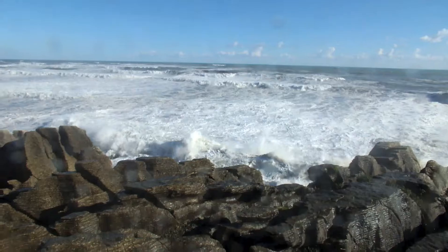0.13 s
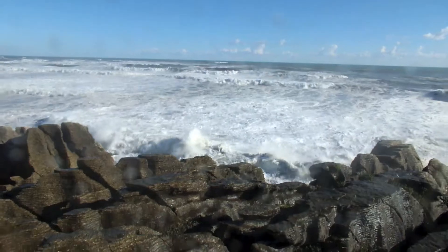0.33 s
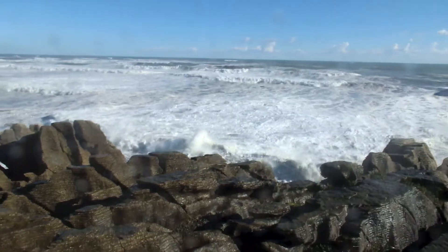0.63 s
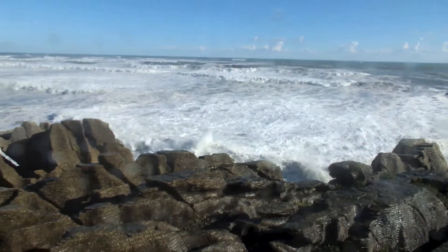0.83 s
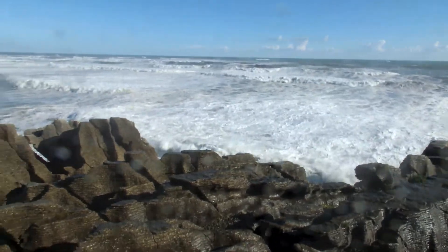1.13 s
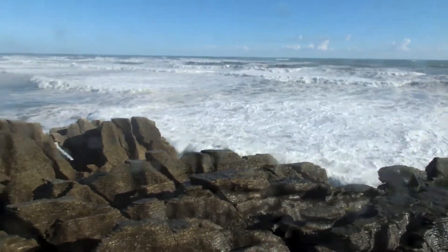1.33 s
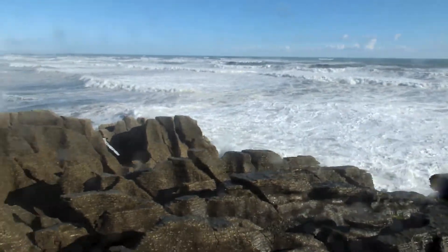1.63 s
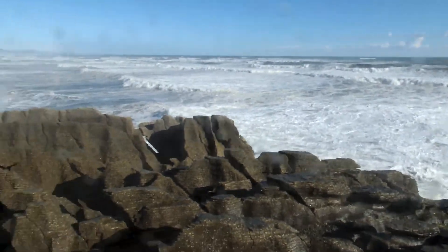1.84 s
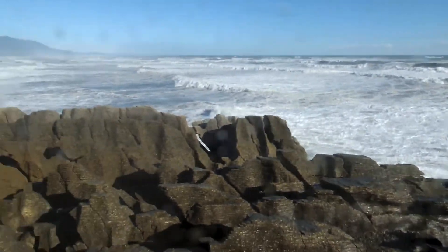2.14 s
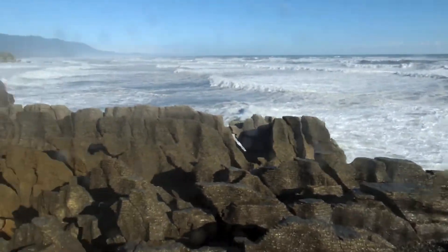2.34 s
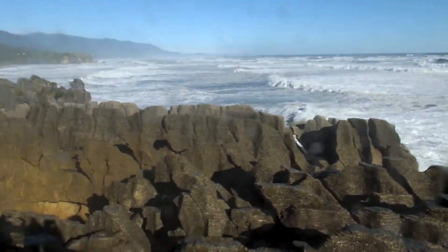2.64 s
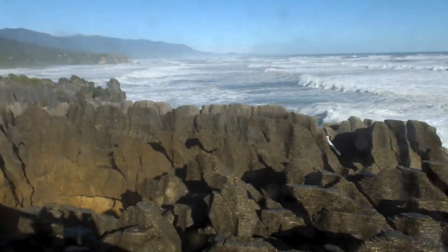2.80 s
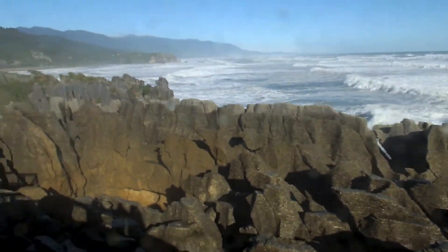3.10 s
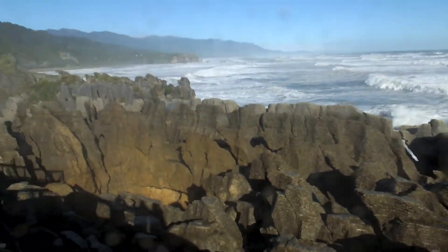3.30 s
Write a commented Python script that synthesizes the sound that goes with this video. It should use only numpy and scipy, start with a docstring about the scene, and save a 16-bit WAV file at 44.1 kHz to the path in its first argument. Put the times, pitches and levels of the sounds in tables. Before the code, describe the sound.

Wind buffets an exposed stereo microphone on a rocky coast, rumbling, fluttering and thumping, with small pops and spitting crackle; surf roars as a broad wash behind, and the right side gusts hardest late on.

```python
"""Gusty wind buffets the two ports of a microphone on a rocky coast, over the roar of surf.
Turbulence at each port is noise split into registers; the upper ones follow that port's gusts, so the sound
brightens with the force of the wind, over a low rumble that swells slowly on both ports.
Eddies add damped oscillations (thumps) and leaking pressure steps (pops); short grainy bursts of bright crackle
spit on the ports. Surf is noise of uneven level, independent on the two sides. All fades in after a silence."""
import sys
import numpy as np
from scipy import signal
from scipy.fft import rfft, irfft
from scipy.io import wavfile

SR = 44100
rng = np.random.default_rng(int(sys.argv[2]) if len(sys.argv) > 2 else 0)


def master_out(mix):
    """Clip the mix to full scale and print it as 16-bit PCM to the path in sys.argv[1]."""
    frames = np.transpose(np.atleast_2d(mix))
    ceiling = np.clip(frames, -1, 1)
    pcm = np.round(ceiling * 32767).astype(np.int16)
    wavfile.write(sys.argv[1], SR, pcm)


N = 152586  # length in samples

# Force of the wind on the left and on the right port. Each row: time in seconds, force in dB.
GUSTS_LEFT = [(0.14, 7), (0.21, 8), (0.29, 10.5), (0.36, 7), (0.38, 0.5), (0.44, 6), (0.48, -5),
              (0.54, 7.5), (0.65, 7), (0.69, 0.5), (0.74, 3), (0.76, 0), (0.83, 5), (0.85, -3.5), (0.91, 6),
              (1.0, 4.5), (1.09, 0), (1.115, -1), (1.15, 9), (1.19, 1), (1.27, 9.5), (1.29, -6), (1.36, 6),
              (1.42, 1.5), (1.49, 8.5), (1.5, -0.5), (1.57, 4), (1.59, -5), (1.66, -0.5), (1.68, 8),
              (1.7, -20), (1.72, 5), (1.78, -4), (1.8, 4), (1.82, -7), (1.85, 4), (1.88, -6.5),
              (1.945, 3.5), (1.967, -6), (1.98, -1.5), (2.06, 1.5), (2.175, -7), (2.22, 4), (2.3, -4.5),
              (2.32, 3.5), (2.34, -8), (2.36, 6.5), (2.38, 9.5), (2.52, 2), (2.555, 17.5), (2.58, 0.5),
              (2.62, 8.5), (2.65, 6.5), (2.67, -13), (2.69, 1.5), (2.75, -7), (2.78, 6), (2.98, 7.5),
              (3.02, 6.5), (3.07, 7), (3.17, 7), (3.28, 4), (3.31, -3.5), (3.35, 11), (3.42, 3.5)]
GUSTS_RIGHT = [(0.2, 7.5), (0.3, 9), (0.37, 2), (0.43, 7.5), (0.49, 1), (0.67, 7), (0.705, -4.5),
               (0.74, 0.5), (0.89, -0.5), (0.915, 2.5), (1.01, 0.5), (1.035, 5), (1.28, 0), (1.31, -2.5),
               (1.37, 7.5), (1.41, 7.5), (1.49, 2.5), (1.51, 6), (1.54, 0), (1.65, 2), (1.675, 7),
               (1.7, -7.5), (1.8, 4), (1.86, -9), (1.88, 4), (1.98, -1.5), (2.0, 5), (2.1, 3.5),
               (2.19, 7.5), (2.26, 0.5), (2.34, 13.5), (2.5, 13.5), (2.62, 18.5), (2.7, 9.5), (2.81, 11.5),
               (2.85, 5.5), (2.875, 12), (2.9, 5), (3.2, 5), (3.25, 9.5), (3.45, 10.5)]
# Spectrum of the wind noise before the gusts shape it. Each row: frequency in Hz, density in dB per Hz.
WIND_SPECTRUM = [(35, -49), (190, -47.5), (350, -49.5), (700, -61), (1400, -73), (3100, -88.5),
                 (4400, -99.5), (6000, -112.5), (12000, -134)]
# How strongly each register follows the force. Each row: frequency in Hz, dB of level per dB of force.
FORCE_RESPONSE = [(60, 0), (180, 0.64), (350, 0.6841), (700, 1.1345), (6000, 0.99)]
# Extra level of the booming upper bass on each port. Each row: time in seconds, level in dB.
BOOM_LEFT = [(0.3, -4), (1.0, -0.5), (1.07, 3.5), (1.3, -3.5), (1.65, 5.5), (2.5, 0.5), (2.84, 0),
             (2.89, 5.5), (3.28, 2), (3.41, 4)]
BOOM_RIGHT = [(0.69, 3.5), (1.48, -6), (1.62, 0.5), (2.22, 5), (2.49, -7.5), (2.78, 1), (2.94, -11.5),
              (3.3, 1.5), (3.4, -6)]
# Extra level of the deep rumble on both ports. Each row: time in seconds, level in dB.
RUMBLE_LEVEL = [(0.2, 1), (0.6, 2), (1.1, 5.5), (1.6, 3.5), (2.0, -4.5), (3.0, -0.5)]
# Large eddies thumping on a port. Each row: start in seconds, peak level in dB, mean pitch in Hz, port.
THUMPS = [(0.22, -10.5, 410, "left"), (0.262, -13.5, 231, "right"), (0.907, -14.5, 407, "both"),
          (1.066, -10.5, 151.4, "left"), (1.138, -13.5, 191, "left"), (1.84, -9, 226.7, "left"),
          (2.877, -8, 218, "left")]
# Sharp pops on the ports. Each row: start in seconds, level before filtering in dB on the louder port,
# left minus right in dB, brightness in Hz (half the low-pass cut-off).
POPS = [(0.163, -7.5, 17, 1000), (0.738, -9, 20, 1000), (1.149, -6, 26, 1100), (1.414, -11, -22, 4470),
        (1.489, -9, 18, 1400)]
# Bursts of spitting. Each row: start in seconds, length in seconds, level at mid-burst in dB, port.
SPITS = [(0.197, 0.01, -34.5, "both"), (0.216, 0.013, -34.5, "both"), (0.255, 0.01, -31, "both"),
         (0.288, 0.01, -32, "left"), (0.426, 0.006, -33, "right"), (0.646, 0.0054, -36, "left"),
         (0.655, 0.007, -36, "right"), (2.341, 0.0072, -26, "right"), (2.356, 0.036, -31.5, "right"),
         (2.432, 0.021, -27.5, "right"), (2.458, 0.024, -29.5, "right"), (2.525, 0.027, -29.5, "right"),
         (2.556, 0.0075, -21.5, "right"), (2.602, 0.035, -29.5, "right"), (2.645, 0.0062, -37, "both"),
         (2.676, 0.018, -32.5, "right"), (2.784, 0.0065, -36, "right"), (2.809, 0.0054, -33.5, "right"),
         (3.067, 0.011, -35.5, "left"), (3.206, 0.028, -36, "right"), (3.274, 0.0064, -37, "both"),
         (3.322, 0.0079, -31, "right"), (3.337, 0.02, -32.5, "both")]
# Colour of the spitting; only its shape counts. Each row: frequency in Hz, relative density in dB per Hz.
SPIT_SPECTRUM = [(450, -4.5), (1200, 9.5), (3000, 5), (5000, -9.5), (8000, -25.5), (14000, -42.5)]
# Spectrum of the surf. Each row: frequency in Hz, density in dB per Hz.
SURF_SPECTRUM = [(60, -56), (400, -73), (1000, -89.5), (2000, -87), (3200, -90.5), (5000, -96.5),
                 (7000, -102), (10000, -108), (14000, -116)]
# Uneven level of the surf, with quick swells and dips. Each row: time in seconds, level in dB.
SURF_LEVEL = [(0.72, -4.5), (0.91, 2.5), (1.0, -4.5), (1.36, -0.5), (1.52, -7), (1.61, 4.5), (1.7, 0.5),
              (2.16, 2.5), (2.95, -9)]
# Opening fade. Each row: time in seconds, level in dB.
FADE_IN = [(0.11, -95), (0.125, -27.5), (0.15, -14.5), (0.175, -4.5), (0.21, 0)]

# turbulence: flutter of the force, and a faster rasp that grows towards the upper registers
FLUTTER_DB, FLUTTER_LO_HZ, FLUTTER_HI_HZ = 2.5, 23.4, 75
RASP_DB, RASP_LO_HZ, RASP_HI_HZ, RASP_HALF_HZ = 4, 60, 350, 790  # half the rasp at RASP_HALF_HZ
# slacker air sheds fewer eddies: force threshold, dB lost per dB under it, register that loses half as much
LULL_DB, LULL_SLOPE, LULL_HALF_HZ = 8.5, 0.52, 180
BOOM_HZ, BOOM_OCTAVES = 248, 1.43  # centre, and distance at which the boom falls to 1/e of its dB
RUMBLE_HALF_HZ = 106  # register that takes half the rumble's dB
THUMP_CYCLES, THUMP_WAVER = 1.83, 0.25  # cycles to the peak, share by which the pitch wavers
POP_DECAY_S = 0.00063
SMALL_POPS_PER_S, SMALL_POP_HZ = 45, 1080  # mean rate, brightness
SMALL_POP_DB, SMALL_POP_FOLLOW, SMALL_POP_SPREAD_DB = -28.5, 0.85, 6  # follow: dB per dB of force
SPIT_GRAIN_DB, SPIT_GRAIN_HZ = 4.5, 1300  # depth and fastest rate of the grain
EDGE_HZ = 15200  # upper band limit


def amp(db):
    """The decibel is logarithmic: 20 dB is a factor of ten in amplitude."""
    return 10 ** (np.asarray(db) / 20)


def over_time(points):
    """Linear interpolation of (seconds, value) rows, sample by sample."""
    return np.interp(np.arange(N) / SR, *np.transpose(points))


def over_hz(points, hz):
    """Interpolation of (Hz, value) rows on a logarithmic frequency axis."""
    f, value = np.transpose(points)
    return np.interp(np.log(hz + 1), np.log(f + 1), value)


def bins():
    """Frequencies in Hz that the Fourier transform resolves over the full length."""
    return np.fft.rfftfreq(N, 1 / SR)


def noise_spectrum(points):
    """Spectral shaping: white noise weighted to a given density in dB per Hz."""
    white = rfft(rng.standard_normal(N))
    return white * amp(over_hz(points, bins())) * np.sqrt(SR / 2)


def noise_pair(points):
    """Incoherent sources: two independent noises of one spectrum, left and right."""
    return np.array([irfft(noise_spectrum(points), N) for _ in range(2)])


def wobble(lo_hz, hi_hz):
    """Band-limited random modulation: 1/f power between two rates, its extremes softened."""
    f = bins() + 1e-6  # avoids division by zero
    shape = 1 / np.sqrt(f * (1 + (lo_hz / f) ** 4) * (1 + (f / hi_hz) ** 4))
    motion = irfft(rfft(rng.standard_normal(N)) * shape, N)
    return 2.5 * np.tanh(motion / motion.std() / 2.5)


def on_port(port):
    """Left and right gain of a sound on the port "left", "right" or "both"."""
    return np.array([[port != "right"], [port != "left"]], float)


def buffeting(force_db, boom_db, count=14):
    """Turbulent pressure at one port: each register of noise follows the fluttering force by its own amount."""
    spectrum = noise_spectrum(WIND_SPECTRUM)
    centres = np.geomspace(30, 12000, count)
    drive_db = force_db + FLUTTER_DB * wobble(FLUTTER_LO_HZ, FLUTTER_HI_HZ)
    lull_db = LULL_SLOPE * np.minimum(drive_db - LULL_DB, 0)
    rasp_db = RASP_DB * wobble(RASP_LO_HZ, RASP_HI_HZ)
    rumble_db = over_time(RUMBLE_LEVEL)
    out = np.zeros(N)
    # overlapping triangular bands, whose weights add up to one
    for hz, share in zip(centres, np.eye(count)):
        weight = over_hz(np.c_[centres, share], bins())
        band = irfft(spectrum * weight, N)
        level_db = np.maximum(over_hz(FORCE_RESPONSE, hz), 0) * drive_db
        level_db += lull_db * hz / (hz + LULL_HALF_HZ)
        level_db += boom_db * np.exp(-(np.log2(hz / BOOM_HZ) / BOOM_OCTAVES) ** 2)
        level_db += rumble_db / (1 + (hz / RUMBLE_HALF_HZ) ** 2)
        level_db += rasp_db * hz / (hz + RASP_HALF_HZ)
        out += band * amp(level_db)
    return out


def thumps():
    """Damped oscillation: a large eddy pushes on a port, and its air swings for a few dying cycles."""
    out = np.zeros((2, N))
    t = np.arange(SR // 8) / SR
    for s, level_db, hz, port in THUMPS:
        at = round(s * SR)
        age = t * hz / THUMP_CYCLES
        envelope = age * np.exp(1 - age)  # peaks at age 1
        waver = THUMP_WAVER * wobble(19, hz)[:len(t)]
        turns = np.cumsum(hz * (1 + waver)) / SR
        swing = envelope * np.sin(2 * np.pi * turns)
        out[:, at:at + len(t)] += on_port(port) * amp(level_db) * swing
    return out


def pop(bright_hz):
    """Pressure relaxation: a step with a rounded edge that leaks away exponentially."""
    step = np.exp(-np.arange(SR // 20) / SR / POP_DECAY_S)
    step = signal.lfilter(*signal.butter(1, 150, "high", fs=SR), step)
    return signal.lfilter(*signal.butter(2, min(2 * bright_hz, SR / 2 - 1), fs=SR), step)


def sharp_pops():
    """Impulsive excitation: the few pops that stand out, each mostly on one port by level difference."""
    out = np.zeros((2, N))
    for s, level_db, pan_db, bright_hz in POPS:
        sound = pop(bright_hz)
        at = round(s * SR)
        port_db = level_db + np.minimum([[pan_db], [-pan_db]], 0)
        out[:, at:at + len(sound)] += amp(port_db) * sound
    return out


def crackle(force_db):
    """Random impulse train: small eddies pop at a constant mean rate, louder in the gusts."""
    hits = (rng.random(N) < SMALL_POPS_PER_S / SR) * rng.choice([-1, 1], N)
    spread_db = SMALL_POP_SPREAD_DB * rng.uniform(-2.2, 1, N)
    size = amp(SMALL_POP_DB + SMALL_POP_FOLLOW * force_db + spread_db)
    return signal.oaconvolve(hits * size, pop(SMALL_POP_HZ))[:N]


def spitting():
    """Amplitude-modulated noise: short grainy bursts of bright crackle, its noise independent on the two ports."""
    t = np.arange(N) / SR
    sizzle = noise_pair(SPIT_SPECTRUM)
    sizzle *= amp(SPIT_GRAIN_DB * wobble(SPIT_GRAIN_HZ / 10, SPIT_GRAIN_HZ))
    bursts = np.zeros((2, N))
    for s, length, level_db, port in SPITS:
        place = 2 * (t - s) / length - 1  # -1 at the start of the burst, 1 at its end
        arch = np.sqrt(np.maximum(1 - place ** 2, 0))
        bursts += on_port(port) * amp(level_db) * arch
    return bursts * sizzle / sizzle.std()


def surf():
    """Incoherent sum of breaking waves and foam: a wide noise of uneven level, independent on the two sides."""
    return noise_pair(SURF_SPECTRUM) * amp(over_time(SURF_LEVEL))


def scene():
    """Superposition: the wind on each port, the thumps, pops and spits, and the surf behind."""
    left = over_time(GUSTS_LEFT), over_time(BOOM_LEFT)
    right = over_time(GUSTS_RIGHT), over_time(BOOM_RIGHT)
    wind = np.array([buffeting(force, boom) + crackle(force) for force, boom in (left, right)])
    return wind + thumps() + sharp_pops() + spitting() + surf()


def record(dry):
    """Saturation and band-limiting: the opening fade, soft overload at full scale, then a low-pass."""
    x = dry * amp(over_time(FADE_IN))
    x = x / (1 + x ** 6) ** (1 / 6)
    low_pass = signal.firwin(255, EDGE_HZ, window=("kaiser", 9), fs=SR)
    return signal.oaconvolve(x, low_pass[None], "same")


dry = scene()
out = record(dry)
master_out(out)
```